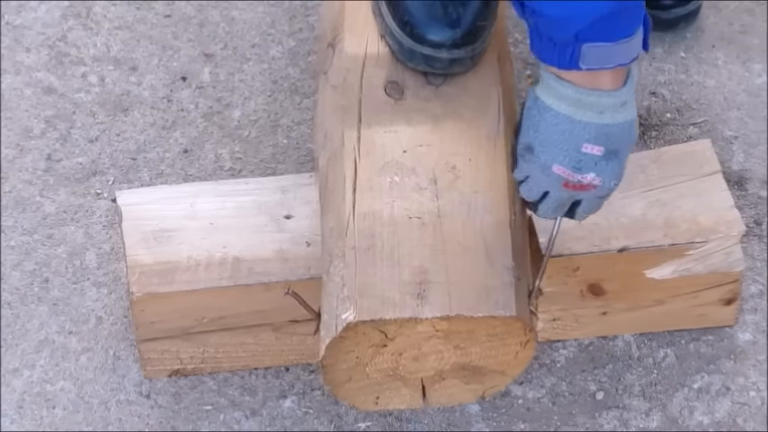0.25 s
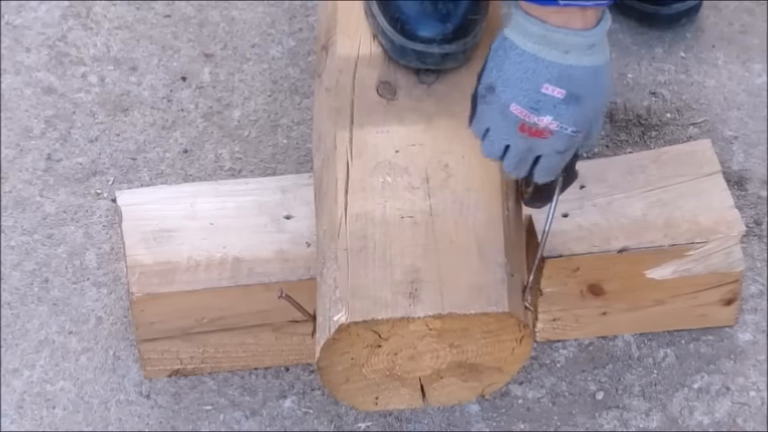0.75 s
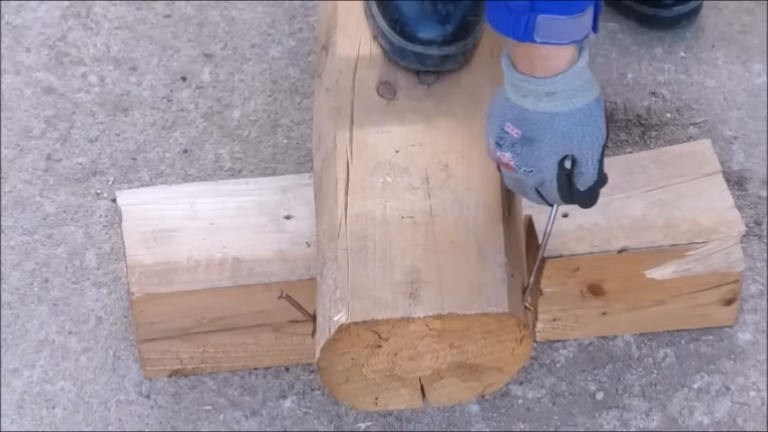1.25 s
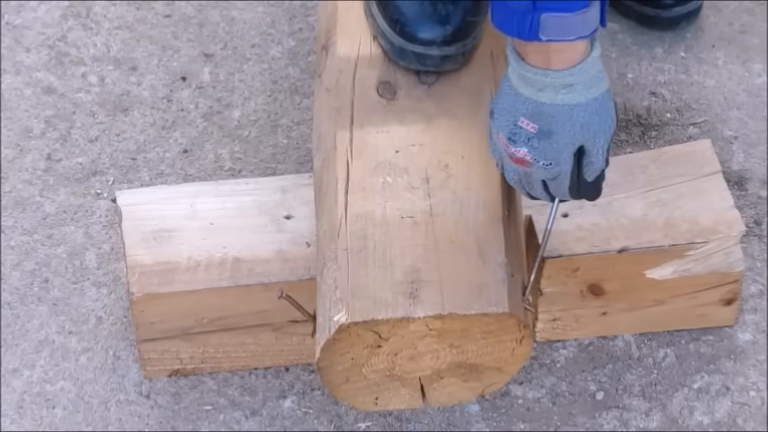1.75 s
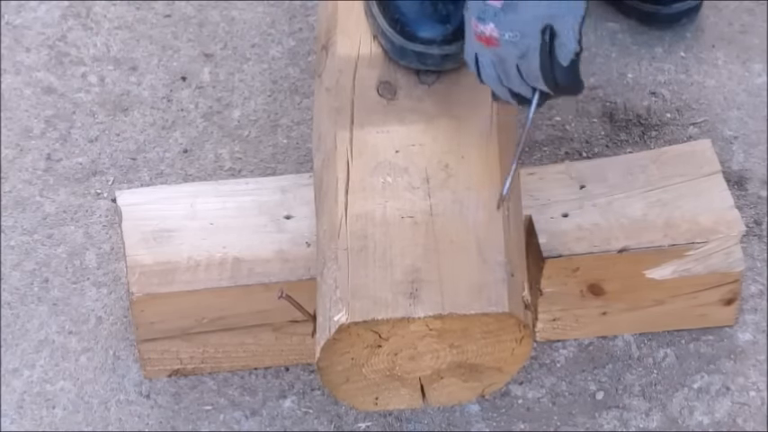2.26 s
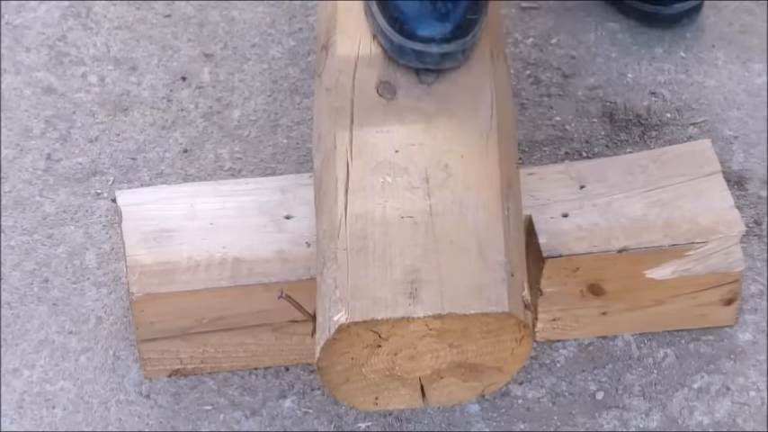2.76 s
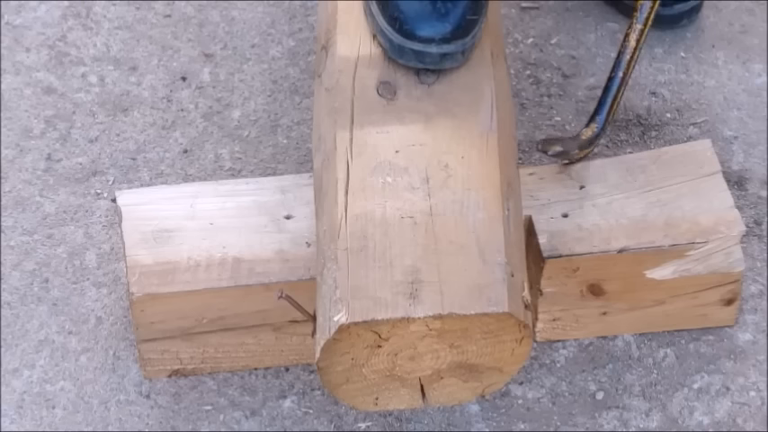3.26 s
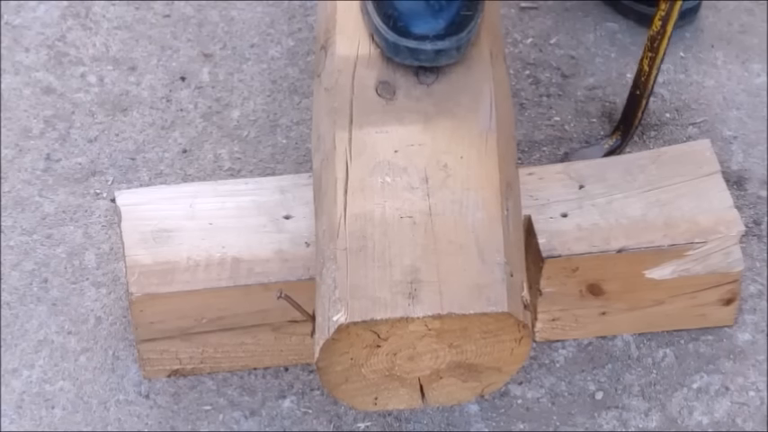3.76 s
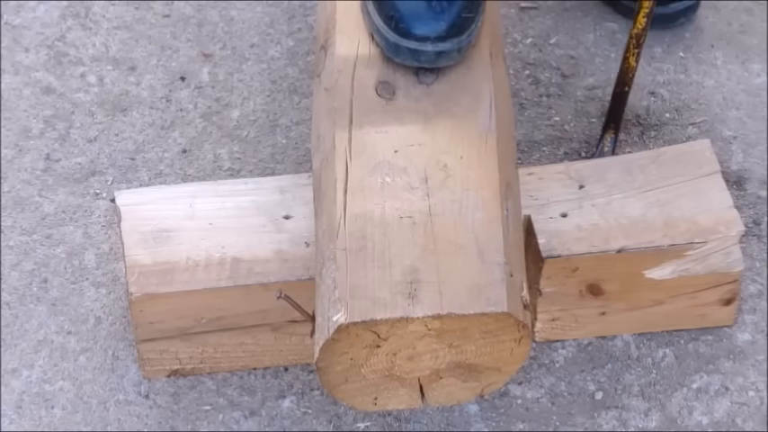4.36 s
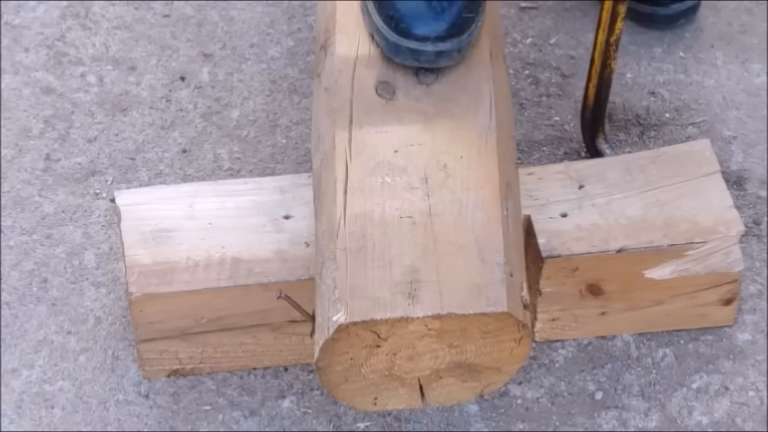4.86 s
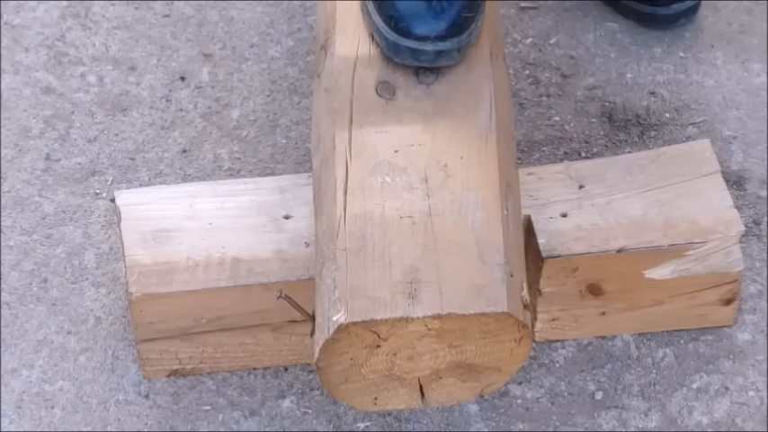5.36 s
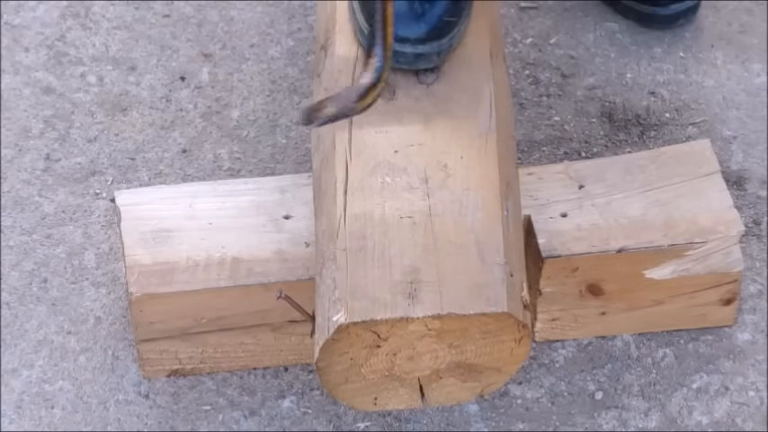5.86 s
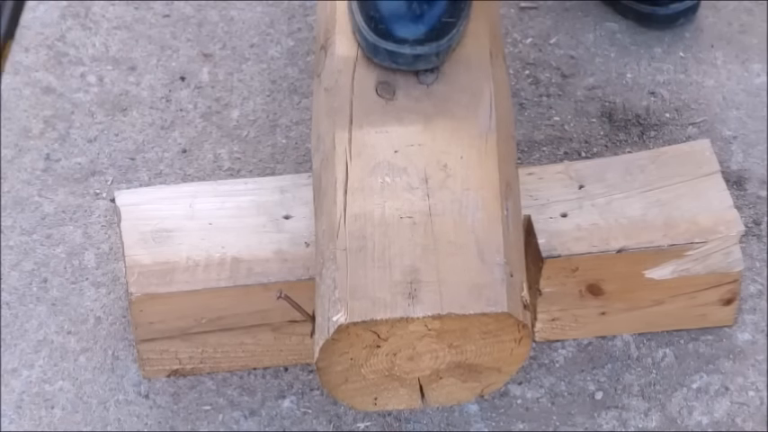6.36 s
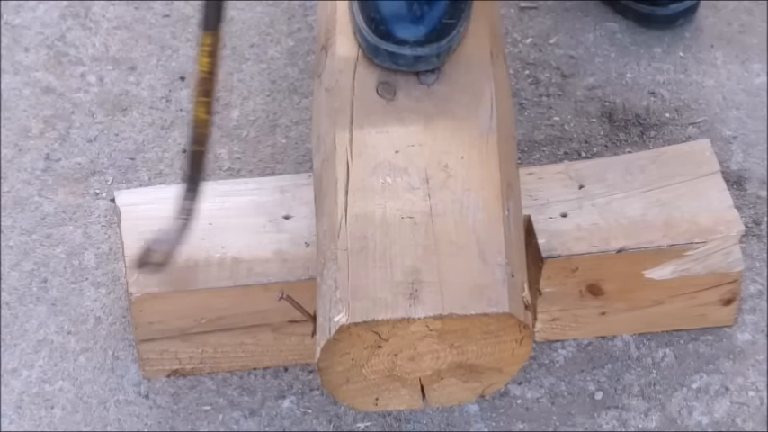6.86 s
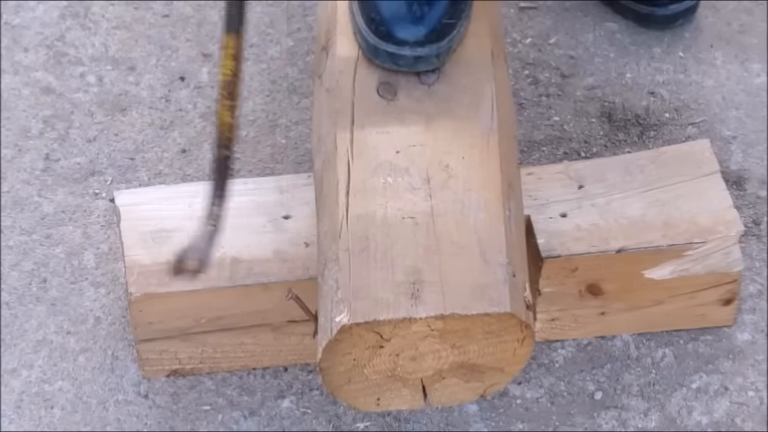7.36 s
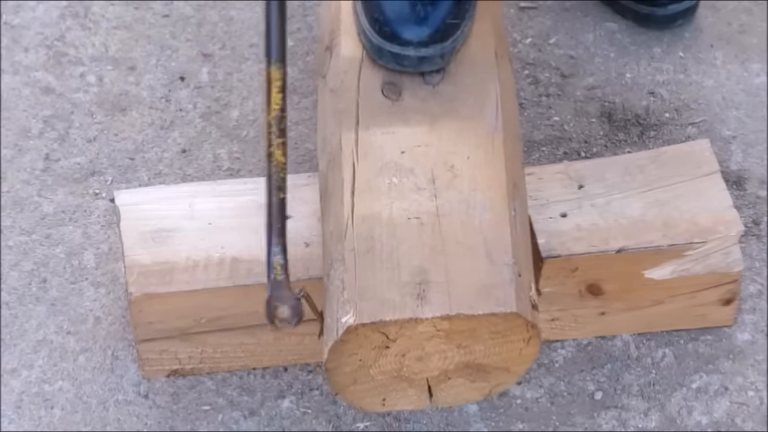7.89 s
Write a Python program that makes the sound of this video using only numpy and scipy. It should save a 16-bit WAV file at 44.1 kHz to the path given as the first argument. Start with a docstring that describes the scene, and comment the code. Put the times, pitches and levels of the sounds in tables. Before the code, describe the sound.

A nail gives a short, high squeal and groan in timber, then squeaks again. A crowbar clinks lightly, and a thin metal tool drops and clatters on concrete. Near the end, the crowbar's claw snaps against a nail three times, with dull thuds from the beams and squeaky rustling of stiff clothes. Light wind bumps the microphone in an outdoor yard.

```python
"""A worker in gloves and stiff clothes pries at nailed timbers on a concrete yard.
First a nail sticks and slips in the wood, squealing and groaning. Throughout, light wind bumps the
microphone, sleeves rustle, and thin squeaks, probably ribbed cloth, follow the arm. Near 3 s a crowbar
clinks, and at 4.3 s a dropped tool clatters. From 6.7 s the steel claw is jabbed at a nail: it snaps,
the beams thud, and at last the nail twangs."""
import sys
import numpy as np
from scipy import signal
from scipy.fft import rfft, irfft
from scipy.io import wavfile
from scipy.ndimage import uniform_filter1d

SR = 44100
rng = np.random.default_rng(int(sys.argv[2]) if len(sys.argv) > 2 else 0)


def master_out(mix):
    """Clip the mix to full scale and print it as 16-bit PCM to the path in sys.argv[1]."""
    frames = np.transpose(np.atleast_2d(mix))
    ceiling = np.clip(frames, -1, 1)
    pcm = np.round(ceiling * 32767).astype(np.int16)
    wavfile.write(sys.argv[1], SR, pcm)


N = 358533
T = np.arange(N) / SR

# the notes a beam rings with: f/Hz, level/dB, ring time/s (the time to fade by 60 dB)
TIMBER_NOTES = [(254.3, -2.5, 0.069), (316, 3.5, 0.09), (352.1, -1, 0.16), (480.4, -11.5, 0.19),
                (553, -8.5, .16), (705.7, -10, 0.21), (892, -29, 0.33), (1044, -13, 0.036),
                (1464, -22.5, 0.067)]
# tone colours of scraped steel and of rubbed cloth: f/Hz, relative level/dB
SCRAPE_COLOUR = [(200, -29), (1000, -25.5), (2200, -10.5), (3000, -5.5), (4000, 0), (5800, -0.5), (8400, 1),
                 (12000, -9), (16000, -14)]
CLOTH_COLOUR = [(150, -6), (1000, -15), (2200, -13), (4000, -4), (6000, -9.5), (7800, 0), (9500, -16.5),
                (12000, -31.5), (16000, -29.5)]


def amp(db):
    return 10 ** (np.asarray(db) / 20)


def unit_level(x):
    return x / np.sqrt(np.mean(x ** 2) + 1e-20)


def value_at(points, hz):
    f, value = np.transpose(points)
    return np.interp(np.log(hz + 1), np.log(f + 1), value)


def swell(curve):
    """A gain that follows rows of t/s, level/dB."""
    s, db = np.transpose(curve)
    return amp(np.interp(T, np.sort(s), db))


def wander(hz):
    """A random wobble of size about 1, mostly slower than hz."""
    spectrum = rfft(rng.standard_normal(N))
    return unit_level(irfft(spectrum / (1 + (np.fft.rfftfreq(N, 1 / SR) / hz) ** 4), N))


def stereo_noise(alike):
    """Left and right hiss, from unrelated (0) to the same (1)."""
    a, b = rng.standard_normal((2, N))
    return np.array([a, alike * a + np.sqrt(1 - alike ** 2) * b])


def convolve(x, response):
    return signal.oaconvolve(np.atleast_2d(x), np.atleast_2d(response), axes=1)[:, :N]


def tone_filter(points, size=4096):
    """The promptest (minimum-phase) filter with a given tone colour."""
    log_gain = np.log(amp(value_at(points, abs(np.fft.fftfreq(size, 1 / SR)))))
    return np.fft.ifft(np.exp(np.conj(signal.hilbert(log_gain)))).real[:size // 2]


def colour(x, points):
    """Shapes the tone; plain hiss keeps its power."""
    response = tone_filter(points)
    return convolve(x, response / np.linalg.norm(response))


def ring(notes):
    """A struck object's notes, as fading sine waves."""
    t = T[:SR // 2]
    return sum(amp(db - 60 * t / ring_s) * np.sin(2 * np.pi * (hz * t + rng.random()))
               for hz, db, ring_s in notes)


def add(mix, s, sound):
    part = mix[..., max(round(s * SR), 0):][..., :sound.shape[-1]]
    part += sound[..., :part.shape[-1]]


def contacts(rows, rise_s=0.0001):
    """The loudness outline of sudden hits that each fade fast."""
    power, t = np.zeros(N), T[:SR // 4]
    for s, db, fade in rows:
        add(power, s, (amp(db) * np.exp(-t / fade) * (1 - np.exp(-t / rise_s))) ** 2)
    return np.sqrt(power)


def place(x, pan_db, echo_db, far_db=-33, far_s=0.43):
    """Adds near echoes and a faint wash from far walls; positive pan is left."""
    # how long the yard echoes: f/Hz, ring time/s
    yard = [(200, 0.26), (1000, 0.21), (4000, 0.26), (8000, 0.26), (12000, 0.16), (16000, 0.017)]
    t = T[:SR]
    hz, s, noise = signal.stft(rng.standard_normal((2, len(t))), SR, nperseg=256)
    near = amp(-60 * s / value_at(yard, hz)[:, None])
    far = amp(far_db - 60 * s / far_s) / (1 + (hz[:, None] / 6000) ** 2)
    tail = signal.istft(noise * (near + far), SR)[1][:, :len(t)] * (1 - np.exp(-t / 0.0006))
    echoes = amp(echo_db) * convolve(x, tail / np.linalg.norm(tail[0]))
    return (x + echoes) * amp([[pan_db / 2], [-pan_db / 2]])


def nail_creak(slips_hz=704, uneven=.13, slip_s=0.00053, rise_s=0.0052):
    """The nail sticks and slips: each tiny jerk rasps the steel and shakes the wood."""
    # pulls: t/s, length/s, relative squeal/dB, relative groan/dB, rasp over squeal/dB, fade/s, pan/dB
    pulls = [(-.025, 0.15, -13.5, -5.5, -1, 0.026, 1), (.219, 0.0068, -31, -8, 16, .005, 1),
             (0.234, 0.036, -14, -8.5, -2, .021, -2), (1.938, 0.051, -27, -31.5, -5, .014, -5),
             (1.998, 0.032, -22, -57, -27, 0.0058, -4)]
    # the nail's own ring, and how well it shakes the wood: f/Hz, relative level/dB
    squeal = [(3000, -37), (6000, -13.5), (7000, 0), (7600, 3.5), (8700, 0), (9600, -13.5), (12000, -35.5)]
    grip = [(200, -10.5), (330, -3), (490, 6), (570, -8.5), (700, -4), (1070, 9), (1480, 7), (2100, -9.5)]
    slip_count = np.cumsum(slips_hz * (1 + uneven * wander(300))) / SR
    slips = (np.diff(np.floor(slip_count), prepend=0) > 0) * amp(rng.standard_normal(N))
    jerks = signal.lfilter([1], [1, -np.exp(-1 / (slip_s * SR))], slips)
    rasp = unit_level(jerks * stereo_noise(0.11))
    steel, groan = np.zeros((2, N)), np.zeros(N)
    for s, length, steel_db, wood_db, rasp_db, fade, pan_db in pulls:
        t = np.maximum(T - s, 0)
        held = (1 - np.exp(-t / rise_s)) * np.exp(-np.maximum(t - length, 0) / fade)
        drive = rasp * held * amp(steel_db - 2.5) * amp([[pan_db / 2], [-pan_db / 2]])
        steel += colour(drive, squeal) + amp(rasp_db) * colour(drive, SCRAPE_COLOUR)
        groan += amp(wood_db - 6) * (t < length) * abs(np.sin(np.pi * t / length)) ** 0.98
    body = ring([(hz, db + value_at(grip, hz), ring_s) for hz, db, ring_s in TIMBER_NOTES])
    wood = convolve(unit_level(slips - slips.mean()) * groan, body / np.linalg.norm(body))
    return (place(steel, pan_db=1.5, echo_db=-20.5)
            + place(wood, pan_db=-1.5, echo_db=-9.5, far_db=-22.5, far_s=1.0))


def wind(lumps_db=6, lumps_hz=27):
    """A lumpy breeze bumps the microphone, mostly on the right, over a faint hush of air."""
    # breeze strength: t/s, relative level/dB
    strength = [(0, -49.5), (.75, -57.5), (1, -50.5), (1.3, -66.5), (1.55, -44.5), (2.15, -82.5),
                (2.65, -59), (2.85, -73), (3.65, -44), (4.1, -82), (4.8, -46), (5.5, -60.5), (5.85, -68),
                (6.2, -69.5), (6.6, -55), (8.13, -64)]
    # gusts: peak t/s, half length/s, relative level/dB
    peaks = [(1.114, 0.043, -35.5), (1.703, 0.053, -37.5), (3.306, 0.072, -30), (4.655, 0.023, -39),
             (4.948, 0.071, -38.5), (5.145, 0.034, -30.5), (6.404, 0.12, -47.5), (7.097, 0.028, -29),
             (7.236, 0.091, -42), (8.056, 0.053, -38.5)]
    # tone colours of still air and of wind bumps: f/Hz, relative level/dB
    air = [(18, -36.5), (30, 4), (84, -4.5), (157, -20), (540, -7), (3220, -14.5), (4080, -18.5),
           (5590, -24.5), (7870, -20), (16000, -31.5)]
    rumble = [(15, -2.5), (40, 3), (80, 4), (130, -6), (200, -24), (400, -45), (1500, -76.5)]
    breeze = swell(strength) * amp(-3 + lumps_db * wander(lumps_hz))
    gusts = sum(amp(db) * np.exp(-((T - s) / length) ** 2) for s, length, db in peaks)
    bumps = colour(stereo_noise(0.66) * (breeze + gusts), rumble)
    return bumps * amp([[-11], [2]]) + amp(-78) * colour(stereo_noise(0.11), air)


def rustle(grain_db=2, warble_db=6):
    """Sleeves and gloves rub with a grainy hiss; a watery, compressed-audio warble is laid over it."""
    # how strongly the clothes rub: t/s, relative level/dB
    movement = [(0, -73), (.9, -75), (2.4, -71), (3.2, -67), (3.4, -58), (3.55, -62), (3.9, -73),
                (4.22, -79.5), (4.6, -63.5), (5.3, -73.5), (5.9, -70), (6.35, -57), (6.66, -69.5),
                (6.9, -49), (7.7, -50.5), (7.82, -58), (8.13, -55)]
    spectra = signal.stft(stereo_noise(.5), nperseg=512)[2]
    warble = uniform_filter1d(rng.standard_normal(spectra.shape[1:]), size=4, axis=0)
    warble = unit_level(uniform_filter1d(warble, size=12, axis=1))
    hiss = unit_level(signal.istft(spectra * amp(warble_db * warble))[1][:, :N])
    rubbing = hiss * swell(movement) * amp(-3 + grain_db * wander(120))
    return place(colour(rubbing, CLOTH_COLOUR), pan_db=-2.5, echo_db=-5)


def claw():
    """The claw snaps against a nail: hard, very short hits of steel on steel."""
    # snaps: t/s, level/dB, fade/s
    snaps = [(.2205, -8, 0.0018), (1.41, -47, 0.0011), (3.2445, -24.5, 0.0031), (6.7475, -1.5, 0.0019),
             (6.7517, 6.5, 0.0003), (6.79, -13, 0.0017), (7.3293, 5, 0.0015), (7.3385, -4.5, 0.003),
             (7.35, -2, 0.0015), (7.8838, 5, 0.0016), (7.903, -13, 0.0017), (7.9705, -3.5, 0.0017),
             (7.989, -17.5, 0.003), (8.036, -25.5, 0.0024)]
    # their tone colour: f/Hz, relative level/dB
    steel = [(200, -23.5), (1200, -24), (2600, -9.5), (4000, -4.5), (6000, -3.5), (7400, 9), (8300, 4.5),
             (9600, -4.5), (12000, -25.5), (16000, -28.5)]
    return place(colour(stereo_noise(0.089) * contacts(snaps), steel), pan_db=1.5, echo_db=-12)


def beams(rattle_db=-3, rattle_s=0.022):
    """A knocked beam rings and rattles on the ground; soft blows lack the high notes."""
    # blows: t/s, level/dB, rise/s, treble cutoff/Hz
    thuds = [(.367, -37.5, 0.0028, 895), (1.697, -30, 0.0012, 405), (3.245, -34, 0.00043, 1900),
             (3.34, -51, 0.0049, 885), (3.627, -27, 0.00011, 4000), (6.755, -11, 0.09, 3000),
             (6.79, -32, 0.0035, 3020), (7.342, -21.5, 0.011, 3000), (7.373, -23, 0.014, 910),
             (7.889, -6, 0.072, 3000), (7.911, -23.5, 0.023, 915), (7.995, -18, 0.075, 2000),
             (8.037, -30.5, 0.003, 5000)]
    # the dull rattle: f/Hz, relative level/dB
    knock = [(60, -17), (150, 4), (300, 6.5), (600, -1), (1000, -9.5), (2200, -18.5), (3500, -24.5),
             (8000, -70)]
    out, t = np.zeros((2, N)), T[:SR // 2]
    rattle = amp(rattle_db) * colour(stereo_noise(0.44), knock)
    for s, db, rise, top_hz in thuds:
        grit = np.roll(rattle, -round(s * SR), axis=1)[:, :len(t)] * np.exp(-t / rattle_s)
        blow = amp(db) * (1 - np.exp(-t / rise)) * (ring(TIMBER_NOTES) + grit)
        add(out, s, signal.lfilter(*signal.butter(2, top_hz, fs=SR), blow))
    return place(out, pan_db=-2.5, echo_db=-17)


def arm_stroke(fastest, rise, fall, top_hz, sag, db, ends_db=-14.5):
    """Pitch and level arch as the arm speeds up and slows: rows of t/s, f/Hz, level/dB."""
    u = np.linspace(-1, 1, 41)
    t = u * np.where(u < 0, rise, fall)
    hz = top_hz * (1 - sag * (t / max(rise, fall)) ** 2)
    return np.transpose([fastest + t, hz, db + ends_db * u ** 2])


def squeaks(waver=0.00388, flutter_db=2, fuzz_hz=340):
    """Ribs of cloth run over each other: speed sets the pitch, and uneven ribs blur it."""
    # arm strokes: fastest t/s, rise/s, fall/s, top f/Hz, pitch sag/fraction, level/dB,
    # then, relative to the main note: fifth above/dB, octave above/dB, fuzz/dB
    strokes = [(0.387, 0.039, 0.037, 3860, 0.13, -60.5, -20, 13, -12),
               (0.856, .055, 0.0486, 3964, 0.11, -57, -27, 3, -13),
               (1.701, 0.065, 0.045, 4100, 0.19, -51, -33.5, -8.5, -12),
               (2.278, 0.2, 0.56, 4035, 0.36, -77, 10, -6.5, -16),
               (3.121, 0.067, 0.044, 4085, .16, -60.5, -3, -1, -8.5),
               (5.12, 0.042, 0.047, 3736, .08, -63, -12, 12.5, -13.5),
               (6.962, 0.011, 0.035, 4420, 0.4, -48.5, -26, -7, -2.5),
               (7.17, 0.011, 0.025, 4130, 0.24, -42.5, -30, 5.5, -2),
               (7.609, 0.1, 0.063, 7700, .52, -38, -66, -56, -0.5),
               (7.861, 0.11, 0.026, 7240, .5, -44.5, -50, -47.5, 1)]
    # three long rubs: t/s, f/Hz, level/dB
    slow = [(1.27, 4130, -73), (1.374, 4253, -64), (1.842, 4142, -60), (1.93, 4144, -49.5)]
    steady = [(6.8, 5164, -33), (6.86, 4544, -36.5), (6.942, 4640, -33), (7.042, 4467, -37.5),
              (7.07, 4516, -38.5), (7.125, 4750, -38)]
    quick = [(7.135, 4380, -28.5), (7.159, 5900, -34), (7.189, 6738, -33.5), (7.195, 6370, -32),
             (7.221, 5680, -29), (7.251, 5186, -27), (7.322, 4747, -33.5)]
    rubs = [(arm_stroke(*arch), fifth, octave, fuzz) for *arch, fifth, octave, fuzz in strokes]
    rubs += [(slow, -20, -25, -20), (steady, -11, -28, -13), (quick, -29, -34, -13)]
    out = np.zeros(N)
    drift, flutter = 1 + waver * wander(73), amp(flutter_db * wander(31))
    fuzz = wander(fuzz_hz) + 1j * wander(fuzz_hz)
    for curve, fifth_db, octave_db, fuzz_db in rubs:
        s, hz, db = np.transpose(curve)
        on = (T > s[0]) & (T < s[-1])
        phase = 2 * np.pi * np.cumsum(np.interp(T[on], s, hz) * drift[on]) / SR
        blur = 1 + amp(fuzz_db) * fuzz[on]
        notes = ((.5, -37), (1, 0), (1.5, fifth_db), (2, octave_db))
        tone = sum(amp(level) * (blur * np.exp(1j * ratio * phase)).real for ratio, level in notes)
        loudness = amp(np.interp(T[on], s, db)) * flutter[on] * signal.windows.tukey(on.sum(), .05)
        out[on] += np.sqrt(2) * tone * loudness
    return place(out, pan_db=-6, echo_db=-3)


def faint_squeaks(count=42, softest_db=-71, spread_db=8, blur=0.022, typical_s=.12):
    """Small slanting arcs of pitch, scattered at random times."""
    out, shake = np.zeros(N + SR), np.resize(wander(560), N + SR)
    for when, pitch, size, curve, length, slant in rng.random((count, 6)):
        u = np.linspace(-1, 1, int(typical_s * (.5 + length) * SR))
        bend = .17 * ((slant - .5) * u - curve * u ** 2)
        hz = 2900 * 2.2 ** pitch * (1 + bend + blur * shake[int(when * N):][:len(u)])
        loudness = amp(softest_db + spread_db * size) * (1 - u ** 2)
        add(out, when * N / SR, loudness * np.sin(2 * np.pi * np.cumsum(hz) / SR))
    return place(out[:N], pan_db=-1.5, echo_db=-1.5)


def crowbar(scrape_db=-16, scrape_s=0.023, rise_s=0.0034):
    """A short scrape rings the bar, mainly the notes within that contact's range."""
    # clinks: t/s, level/dB, lowest f/Hz, highest f/Hz
    clinks = [(2.762, -30, 4220, 14000), (3.359, -46, 200, 1970), (3.42, -45, 199, 1980),
              (3.471, -63, 200, 4000), (3.623, -36.5, 201, 8100)]
    # the bar's notes: f/Hz, level/dB, ring time/s
    notes = [(289.6, 12.5, 0.051), (1174, -20, 0.092), (1677, -15, 0.14), (2415, -12.5, 0.091),
             (2960, -24, 0.2), (4130, -34, 0.7), (5330, -10, 0.13), (6090, -17, 0.12), (5850, -15, .22),
             (6740, -6.5, 0.063), (7870, -0.5, 0.057), (7850, -56, .15), (8530, 1, 0.13), (8877, -17, 0.12),
             (9150, -11.5, 0.1), (9430, -9, 0.12), (10340, -16, 0.19)]
    out, onset = np.zeros((2, N)), 1 - np.exp(-T[:SR // 2] / rise_s)
    for s, db, low_hz, high_hz in clinks:
        reached = [(hz, level - 10 * np.log10((1 + (low_hz / hz) ** 4) * (1 + (hz / high_hz) ** 16)),
                    ring_s) for hz, level, ring_s in notes]
        add(out, s, amp(db) * onset * np.array([ring(reached), ring(reached)]))
    touches = contacts([(s, db + scrape_db, scrape_s) for s, db, *_ in clinks])
    scrape = colour(stereo_noise(0.23) * touches, SCRAPE_COLOUR)
    return place(out + scrape, pan_db=-4, echo_db=1)


def bar_slides(grain_db=3, rise_db_per_s=434):
    """The bar slides through the glove and along the wood, swelling up to each contact."""
    # slides: loudest t/s, relative level/dB, fall/(dB per s)
    slides = [(3.468, -41.5, 427), (6.757, -25.5, 330), (7.333, -38.5, 129), (7.883, -35, 101),
              (8.13, -39.5, 290)]
    friction = sum(amp(db - np.maximum((s - T) * rise_db_per_s, (T - s) * fall))
                   for s, db, fall in slides)
    hiss = stereo_noise(.5) * friction * amp(-6 + grain_db * wander(100))
    return place(colour(hiss, CLOTH_COLOUR), pan_db=-8, echo_db=-5)


def dropped_tool(ring_db=-5, grit_db=2):
    """Gritty bounces on concrete keep a thin shaft ringing."""
    # bounces: t/s, level/dB, fade/s
    bounces = [(4.3075, -11, 0.0065), (4.319, -14, 0.021), (4.3435, -16, 0.0097), (4.354, -12, 0.013),
               (4.376, -21, 0.0073), (4.396, -27.5, 0.029), (4.416, -15.5, 0.01), (4.433, -20.5, 0.013),
               (4.511, -34, 0.0064), (4.575, -45, 0.051), (4.674, -38.5, 0.0099)]
    # the shaft's notes: f/Hz, relative level/dB, ring time/s
    notes = [(3604, -12.5, 0.13), (4600, -20, 0.13), (5900, -8, .08), (7105, 5, 0.17), (7650, -5, .12),
             (10900, -9.5, .15), (11970, -10, .13), (14900, -12, .1), (7750, -13.5, .22), (7060, -3, .2),
             (8050, -11.5, .17), (8180, -6.5, .15), (11040, -18, .13)]
    # tone colour of struck concrete: f/Hz, relative level/dB
    concrete = [(80, -49), (160, -1), (220, 3), (600, 5), (1500, 1.5), (2500, -7), (4000, -5.5), (6000, -5),
                (7500, 9), (9500, -9), (12500, -18.5), (16000, -28)]
    grit = stereo_noise(0.2) * contacts(bounces) * unit_level(amp(grit_db * wander(250)))
    shaft = ring(notes)
    ringing = amp(ring_db) * convolve(grit, shaft / np.linalg.norm(shaft))
    return place(colour(grit, concrete) + ringing, pan_db=-0.5, echo_db=-9)


def nail_twangs(rise_s=0.0011):
    """A nail bent aside swings back with one short note."""
    # twangs: t/s, f/Hz, level/dB, ring time/s
    twangs = [(7.883, 2473, -19.5, 0.028), (7.9, 2090, -17.5, 0.029), (8.045, 1495, -29.5, 0.037)]
    out, t = np.zeros(N), T[:SR // 2]
    for s, hz, db, ring_s in twangs:
        add(out, s, ring([(hz, db, ring_s)]) * (1 - np.exp(-t / rise_s)))
    return place(out, pan_db=-4, echo_db=0)


def scene():
    return (nail_creak() + wind() + rustle() + claw() + beams() + squeaks() + faint_squeaks()
            + crowbar() + bar_slides() + dropped_tool() + nail_twangs())


def record(dry, top_hz=16200):
    """Each side of the microphone has its own tone; the hardest snaps clip; the top treble is cut."""
    # balance of the two sides: f/Hz, left minus right/dB
    balance = [(100, -1), (1000, -3), (4000, -4.5), (6000, -2), (8000, -6), (10000, -14), (14000, -2.5)]
    sides = np.array([tone_filter([(hz, side * db / 2) for hz, db in balance]) for side in (1, -1)])
    clipped = np.clip(convolve(dry, sides), -1, 1)
    treble_cut = signal.firwin(511, top_hz, window=("kaiser", 9), fs=SR)
    return signal.oaconvolve(clipped, treble_cut[None], "same")


dry = scene()
out = record(dry)
master_out(out)
```